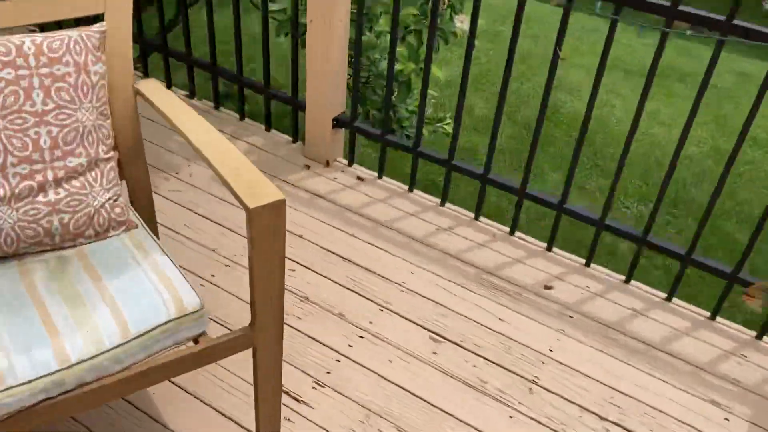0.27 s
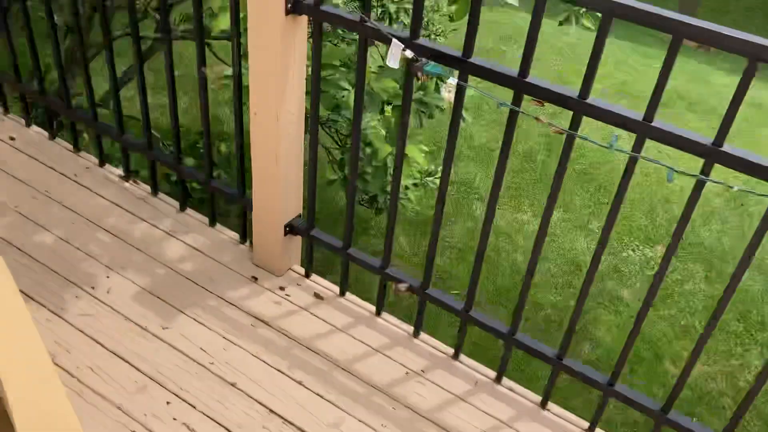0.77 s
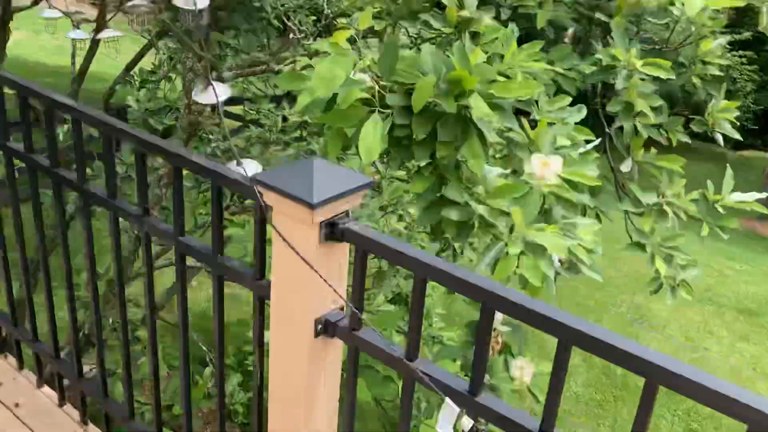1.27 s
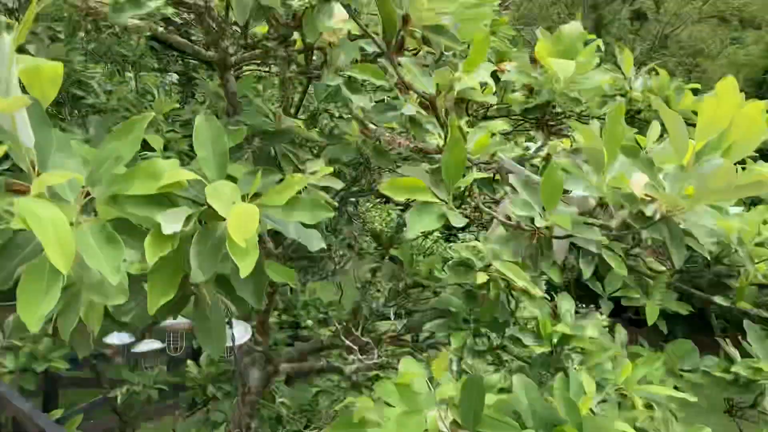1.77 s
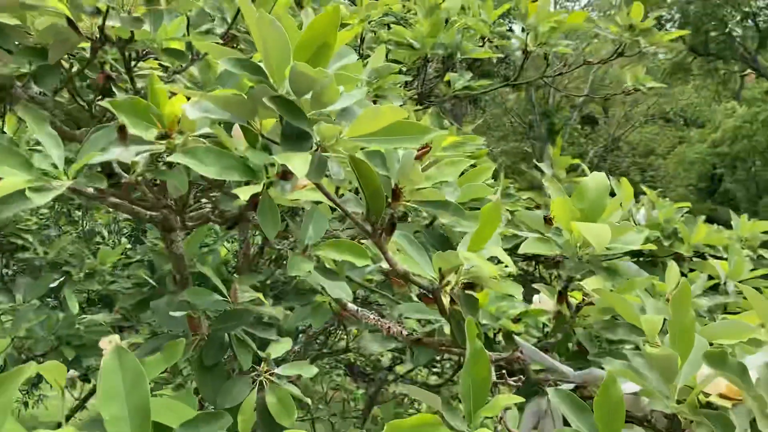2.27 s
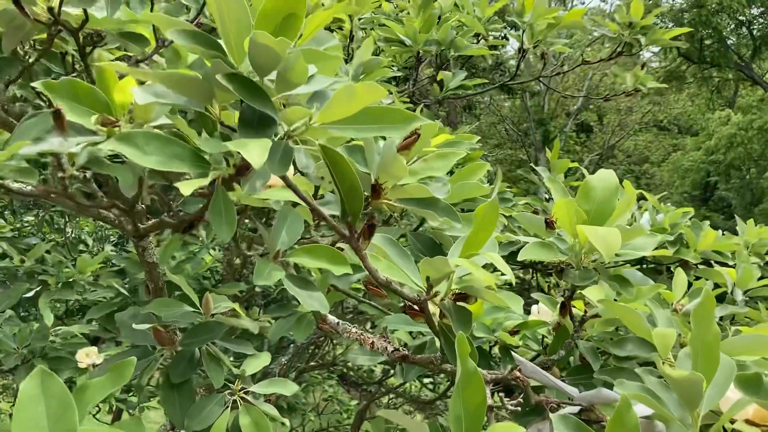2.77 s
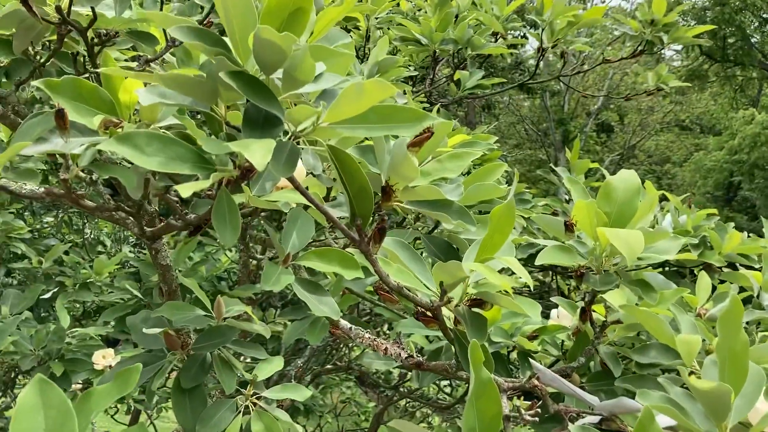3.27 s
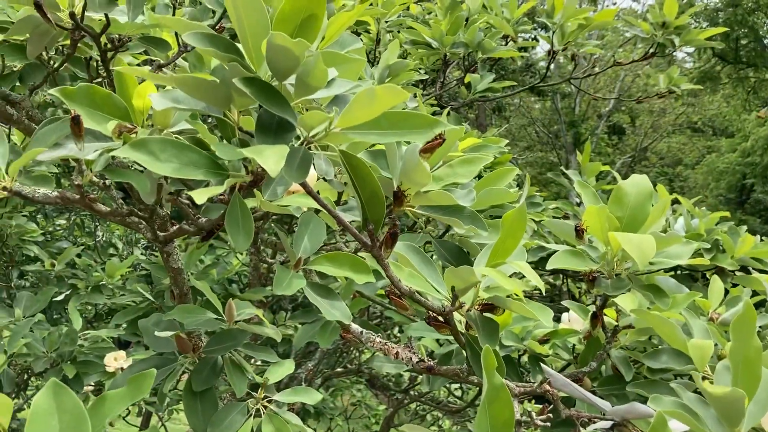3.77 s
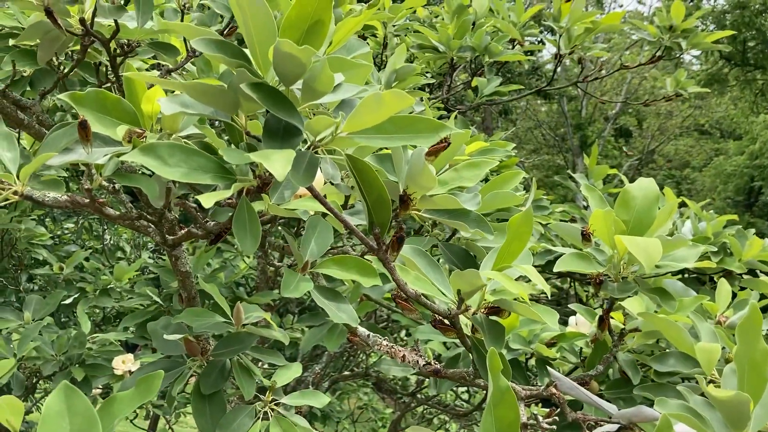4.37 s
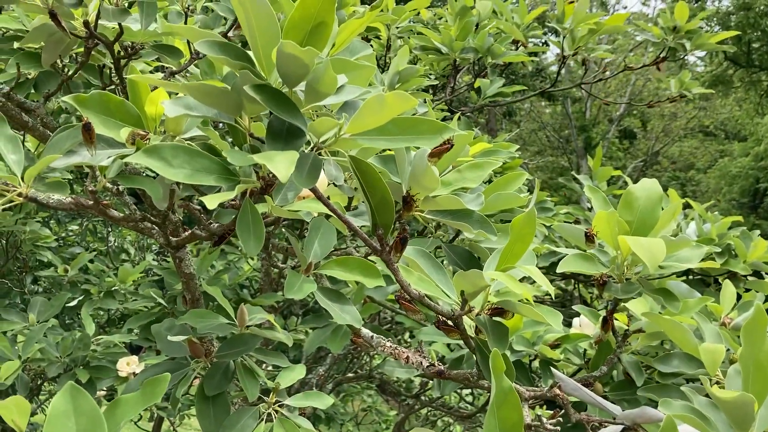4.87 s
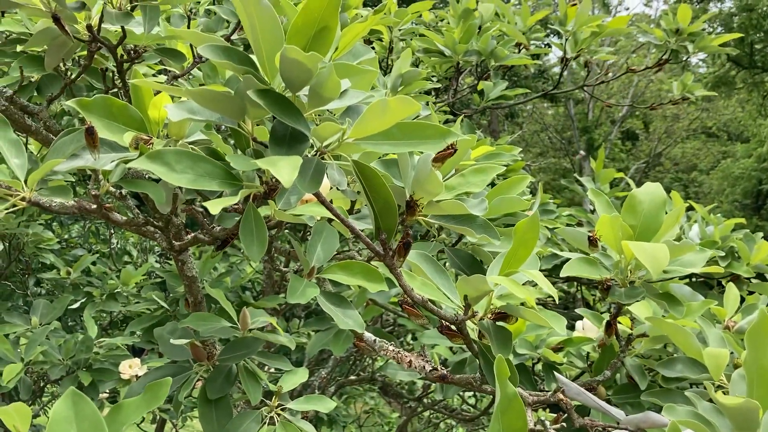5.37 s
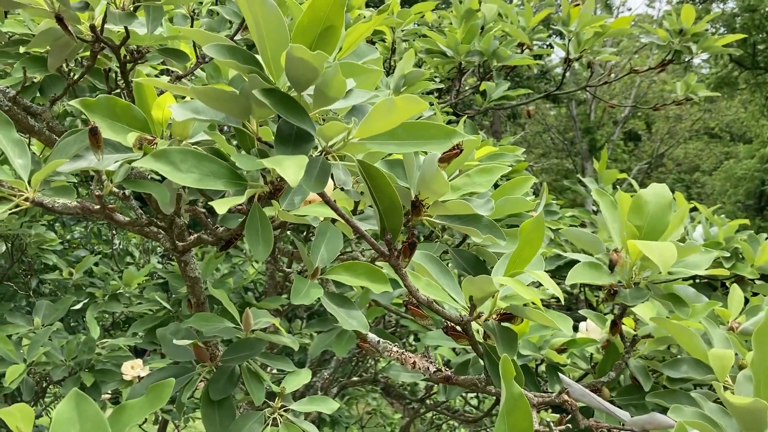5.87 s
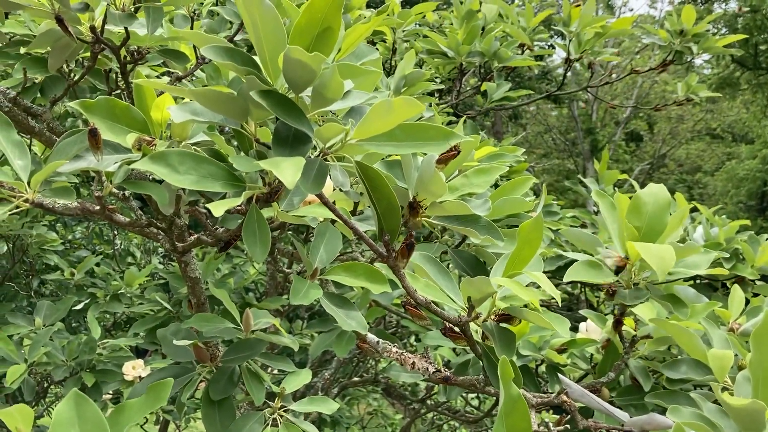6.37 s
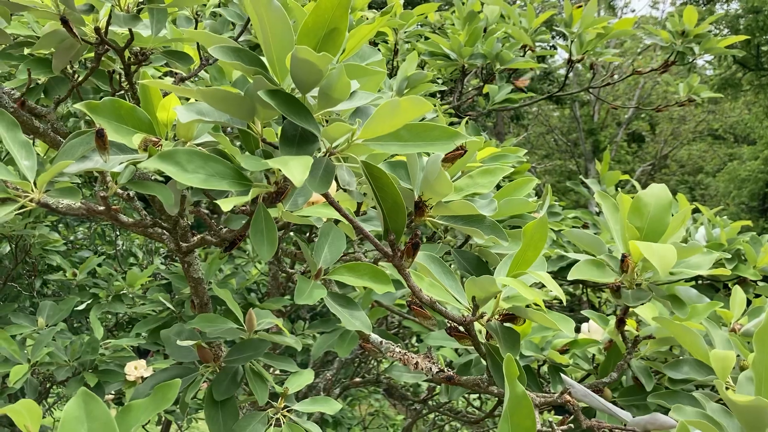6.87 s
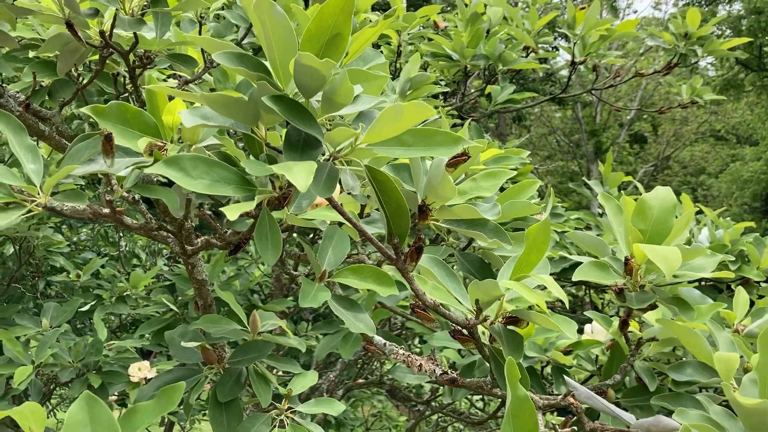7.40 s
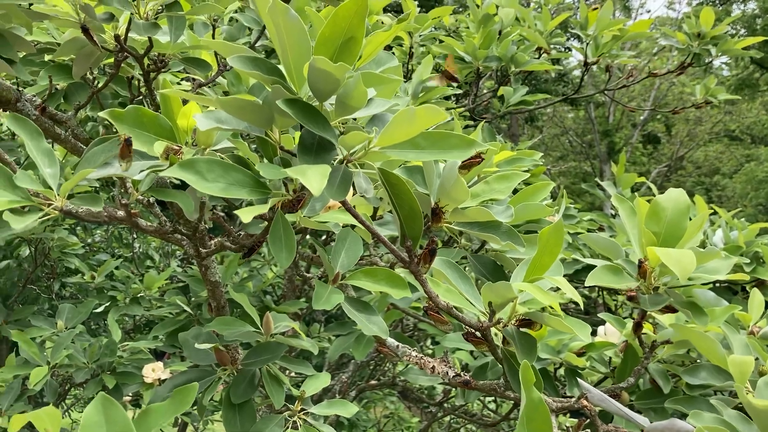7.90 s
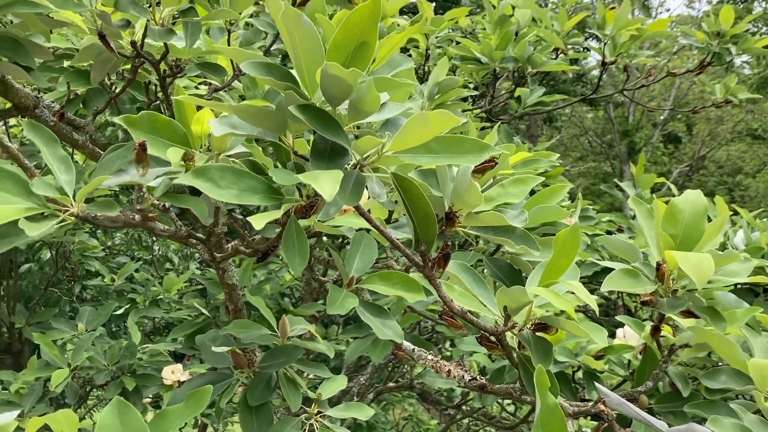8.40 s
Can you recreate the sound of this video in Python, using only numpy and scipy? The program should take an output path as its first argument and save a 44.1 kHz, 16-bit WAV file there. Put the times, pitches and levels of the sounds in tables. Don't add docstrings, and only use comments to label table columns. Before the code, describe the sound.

Hundreds of cicadas in garden trees hiss and buzz in one slow swelling wave, with a few soft knocks on deck boards early on.

```python
import sys
import numpy as np
from scipy import signal
from scipy.fft import rfft, irfft
from scipy.io import wavfile
from scipy.ndimage import uniform_filter1d

SR = 44100
rng = np.random.default_rng(int(sys.argv[2]) if len(sys.argv) > 2 else 0)


def digitize_waveform(pressure):
    field = np.atleast_2d(pressure).T
    bounded = np.clip(field, -1, 1)
    quanta = np.round(bounded * 32767).astype(np.int16)
    wavfile.write(sys.argv[1], SR, quanta)


def ratio_of_db(decibels):
    return 10 ** (np.asarray(decibels, float) / 20)


N = 381024
LINES_N = 1024


def evened(x):
    return x / np.sqrt(np.mean(abs(x) ** 2) + 1e-20)


def read(points, hz, axis=1):
    table = np.transpose(points)
    return np.interp(np.log(hz + 1), np.log(table[0] + 1), table[axis])


def wander(shape, size):
    noise = rng.standard_normal(shape)
    return evened(uniform_filter1d(uniform_filter1d(noise, size), size))


def chorus():
    # frequency in Hz, level in dB per Hz.
    body_points = [(1500, -45), (2200, -39.5), (2800, -30.5), (3200, -23), (3600, -13), (4200, -6),
                   (4900, -7.5), (5600, -1.5), (6100, 0.5), (6700, -3.5), (7400, -12), (8500, -13),
                   (9700, -19), (12800, -22), (14400, -37), (16000, -29)]
    # time in seconds, effort in dB.
    calling = [(0.0, -31.5), (0.9, -29), (1.3, -28.5), (1.75, -26.5), (2.55, -24.5), (3.1, -20.5),
               (3.5, -20), (3.8, -17.5), (4.18, -17), (4.35, -20), (5.15, -29), (5.65, -31.5), (6.3, -28.5),
               (6.9, -30), (7.5, -29.5), (8.64, -26.5)]
    rest_effort_db = -28
    turn_s, turn_length_s = 1.5, 4.5
    tick_share, pan_db = .26, -4

    crowds = []
    for side in range(2):
        buzz = clicks(300., .12, 3., count=90)
        ticks = clicks(28., .15, 4., count=60)
        crowds.append(np.sqrt(1 - tick_share ** 2) * buzz + tick_share * ticks)
    pair = ports(*stranded(np.array(crowds), depth_db=4.5))
    hz, t, z = signal.stft(pair, SR, nperseg=512, noverlap=384)

    effort_db = np.interp(t, *np.transpose(calling))
    effort_rise_db = effort_db - rest_effort_db
    facing = np.clip((t - turn_s) / turn_length_s, 0, 1)
    falling = np.maximum(-np.gradient(uniform_filter1d(effort_db, size=150), t) / 10, 0)
    low_db = 1.0 * falling - 9.5 + 1.63 * facing - 0.19 * effort_rise_db
    high_db = -1.5 * falling - 20.5 + 2.4 * facing + 0.039 * effort_rise_db
    low = 1 / (1 + (hz / 5000) ** 10)
    high = 1 / (1 + (8200 / (hz + 1)) ** 10)
    colour_db = np.outer(low, low_db + 7.5) + np.outer(high, high_db + 16.5)

    body = evened(ratio_of_db(read(body_points, hz)))
    patches = evened(uniform_filter1d(wander((len(hz), len(t)), size=7), size=9, axis=0))
    flicker = wander(len(t), size=4) * (.25 + .5 * high[:, None])
    level_db = uniform_filter1d(effort_db, size=30) + 4.0 + colour_db
    z = z * body[:, None] * ratio_of_db(level_db + .6 * patches + 0.8 * flicker)

    lean_db = 0.49 * pan_db * np.exp(-((hz - 5900) / 800) ** 2)
    z = z * ratio_of_db(np.array([.5, -.5])[:, None, None] * lean_db[:, None])
    return signal.istft(z, SR, nperseg=512, noverlap=384)[1][:, :N]


def clicks(per_s, jitter, spread_db, count):
    buckles = int(N / SR * per_s * 1.5)
    rate = per_s * rng.uniform(.75, 1.3, (count, 1))
    gaps = (1 + jitter * rng.standard_normal((count, buckles))) / rate
    at = np.cumsum(gaps, axis=1) - rng.random((count, 1)) / rate
    polarity = rng.choice([-1., 1.], (count, 1))
    size = ratio_of_db(spread_db * wander((count, buckles), size=40)) * polarity
    inside = (at > 0) & (at < (N - 1) / SR)
    train = np.bincount((at[inside] * SR).astype(int), size[inside], N)
    return evened(train - train.mean())


def stranded(x, depth_db):
    z = signal.stft(x, nperseg=1536, noverlap=1152)[2]
    z = z * ratio_of_db(depth_db * wander(z.shape, size=2))
    return evened(signal.istft(z, nperseg=1536, noverlap=1152)[1][..., :N])


def ports(a, b):
    # frequency in Hz, likeness from 0 to 1, lead of the right in turns.
    coherence = [(30, 0.97, 0.01), (90, 0.98, 0.02), (191, .9, .05), (423, .7, .15), (701, .5, .26),
                 (1115, 0.2, .27), (1810, .4, .47), (2510, 0, 1.01), (4203, 0.21, 1.04), (5393, .15, 1.55),
                 (6420, 0.4, 1.9), (6940, .8, 2.02), (7962, .7, 2.246), (8922, 0.99, 2.496),
                 (10080, 0.7, 2.805), (11300, 0.86, 3.01), (12340, .85, 3.19), (13300, 1, 3.51),
                 (15090, 1, 3.74), (15300, .92, 4.01)]
    hz = np.fft.rfftfreq(N, 1 / SR)
    same = np.clip(read(coherence, hz), 0, 1)
    turns = np.interp(hz, np.transpose(coherence)[0], np.transpose(coherence)[2])
    left = rfft(a)
    right = same * left + np.sqrt(1 - same ** 2) * rfft(b)
    right = right * np.exp(2j * np.pi * turns)
    return irfft([left, right], N)


def steps():
    # start in seconds, peak in dB, pitch in Hz, T60 in seconds.
    footfalls = [
        (.497, -41, 66, .25),
        (.49, -43, 210, .15),
        (0.666, -38.5, 57.4, 0.51),
        (7.14, -50, 45, 0.34),
    ]
    t = np.arange(N) / SR
    out = np.zeros(N)
    for start_s, peak_db, pitch_hz, t60_s in footfalls:
        since_s = np.maximum(t - start_s, 0)
        decay = ratio_of_db(peak_db - 60 * since_s / t60_s)
        out += decay * np.sin(2 * np.pi * pitch_hz * since_s) * (since_s < .075)
    return uniform_filter1d(out, size=60)


def throbbing(level_db, points, throb_db):
    gain = ratio_of_db(read(points, np.fft.rfftfreq(N, 1 / SR)))
    blur = evened(irfft(rfft(rng.standard_normal((2, N))) * gain, N))
    return ratio_of_db(level_db + throb_db * wander(N, size=1200)) * blur


def leaves():
    # frequency in Hz, level in dB per Hz.
    rustle = [(120, -16.5), (200, -0.5), (240, 0), (290, -4.5), (400, -4), (600, -7.5), (1100, -6.5),
              (1600, -16), (2400, -20), (4000, -59.5)]
    return throbbing(-53.5, rustle, .9)


def far_brood():
    # frequency in Hz, level in dB per Hz.
    drone = [(1000, -50), (1180, -6), (1260, 0.5), (1320, 5), (1390, -5.5), (1480, -19), (1700, -45)]
    return throbbing(-56.5, drone, .8)


def traffic():
    # frequency in Hz, level in dB per Hz.
    rumble = [(15, -45), (28, -26), (42, -12.5), (55, -1), (70, -1.5), (95, -7), (120, -5.5), (170, -10),
              (260, -18.5), (400, -41.5)]
    return throbbing(-53, rumble, .8)


def engine():
    # frequency in Hz, level in dB per Hz.
    hum = [(60, -33), (70, -8.5), (75, 1.5), (80, -11.5), (92, -40), (225, -41.5), (240, -11), (255, -42)]
    pass_s, pass_width_s, pass_db = 5.8, 1.1, 9.5
    nearness = np.exp(-((np.arange(N) / SR - pass_s) / pass_width_s) ** 2)
    return throbbing(-60 + pass_db * nearness, hum, 1.0)


def far():
    bass_pan_db = -0.55
    crowds = leaves() + far_brood() + traffic() + engine()
    return ports(*crowds) * ratio_of_db([[bass_pan_db / 2], [-bass_pan_db / 2]])


def scene():
    return chorus() + steps() + far()


def windows(count, steep_share):
    bell = np.cumsum(np.kaiser(LINES_N + 1, 4 * np.pi))
    sine = np.sin(np.pi * (np.arange(LINES_N) + .5) / (2 * LINES_N))
    rises = np.array([sine, np.sqrt(bell[:-1] / bell[-1])])
    rise = rises[(rng.random(count + 1) < steep_share).astype(int)]
    return np.concatenate([rise[:-1], rise[1:, ::-1]], axis=1)


def thinned(x):
    # frequency in Hz, step in dB, level in dB under which a band is dropped.
    thrift = [(102.3, -20.5, -40), (297.5, -8, -30), (598, -2, -20), (950, 3, -6), (1290, -1.5, -20),
              (1550, 6.5, -20), (3000, 8.5, -20), (3505, 1, -20), (3944, -5.5, -20), (6560, -8, -20),
              (7200, 0.5, -7.5), (8060, -2, -7), (8643, 2.5, -6.5), (9220, -0.5, -2), (9930, 1.5, -1.5),
              (10300, -1.5, -8), (11130, -0.6, -5), (11760, -7, -4.5), (12340, -3, -4.5), (13050, 5, -3),
              (13600, 2, 0), (14100, 6, -4), (14800, 13, -2), (15390, 7, -5), (16400, 16, 40.5)]
    band_edges = np.r_[0:40:4, 40:96:8, 96:144:12, 144, 160, 176, 196, 216, 240, 264, 292, 320:960:32, 1024]
    grid_offset, top_line = 632, 731

    n, k = np.arange(2 * LINES_N)[:, None] + .5, np.arange(LINES_N) + .5
    basis = np.cos(np.pi / LINES_N * (n + LINES_N / 2) * k) * np.sqrt(2 / LINES_N)
    lead, frames = 2 * LINES_N - grid_offset, N // LINES_N + 4
    pair = np.zeros((2, frames * LINES_N))
    pair[:, lead:lead + N] = x[0] + x[1], x[0] - x[1]
    halves = pair.reshape(2, frames, LINES_N)
    window = windows(count=frames - 1, steep_share=.58)
    lines = (window * np.concatenate([halves[:, :-1], halves[:, 1:]], axis=2)) @ basis

    widths = np.diff(band_edges)
    band = np.repeat(np.arange(len(widths)), widths)
    hz = (band_edges[1:] + band_edges[:-1]) * SR / (4 * LINES_N)
    power = np.add.reduceat(lines ** 2, band_edges[:-1], axis=2) / widths
    level_db = 10 * np.log10(abs(uniform_filter1d(power, size=3, axis=1)) + 1e-20)
    louder_db = uniform_filter1d(level_db, size=5, axis=1).max(axis=0)

    mood_db = wander((2, len(hz), frames - 1), size=2).transpose(0, 2, 1)
    frame_db = 1.2 * rng.standard_normal((frames - 1, 1))
    step = ratio_of_db(louder_db + read(thrift, hz) + 1.3 * mood_db[:1] + frame_db)[..., band]
    kept = (level_db > louder_db + read(thrift, hz, axis=2) + 1.6 * mood_db)[..., band]
    whole = np.floor((abs(lines) / step) ** .75 + .4054)
    whole[..., top_line:] = 0
    rounded = np.sign(lines) * whole ** (4 / 3) * step * kept

    out = window * (rounded @ basis.T)
    pair = np.zeros((2, frames, LINES_N))
    pair[:, :-1] += out[..., :LINES_N]
    pair[:, 1:] += out[..., LINES_N:]
    mid, side = pair.reshape(2, -1)[:, lead:lead + N]
    return np.array([mid + side, mid - side]) / 2


def band_limit(x):
    return signal.sosfilt(signal.butter(12, 17100, fs=SR, output="sos"), x)


def record(dry):
    # time in seconds, gain in dB.
    gain_points = [
        (3.1, 0.0),
        (3.8, -4),
        (4.6, -6),
        (5.3, -6),
        (5.6, -4),
        (6.8, -3),
        (8.64, -2.5),
    ]
    gain_db = np.interp(np.arange(N) / SR, *np.transpose(gain_points))
    mix = thinned(dry * ratio_of_db(gain_db))
    return band_limit(mix)


dry = scene()
out = record(dry)
digitize_waveform(out)
```